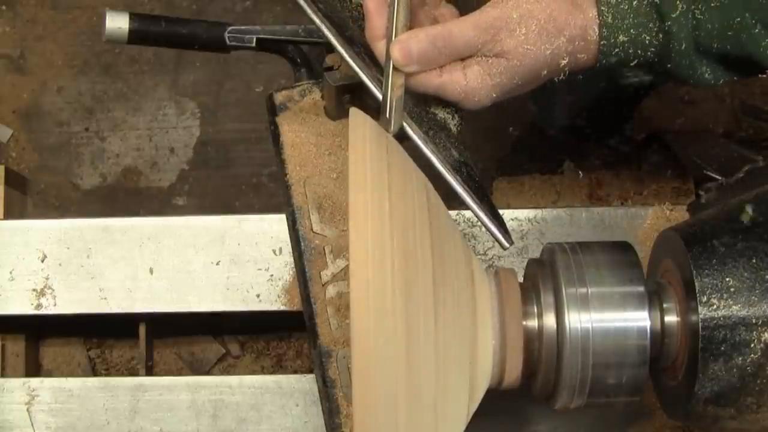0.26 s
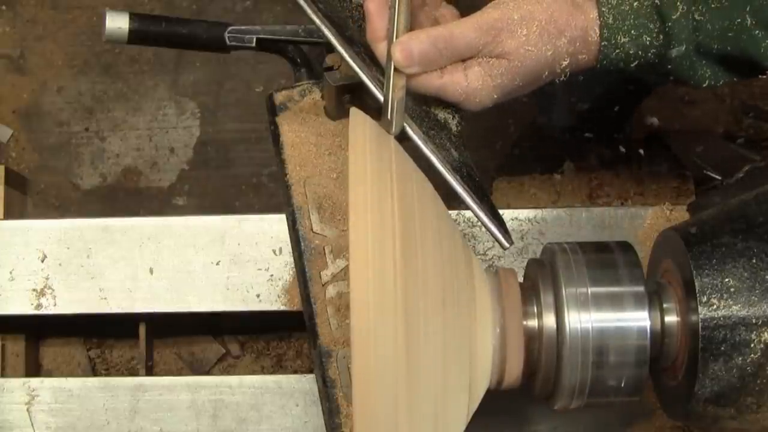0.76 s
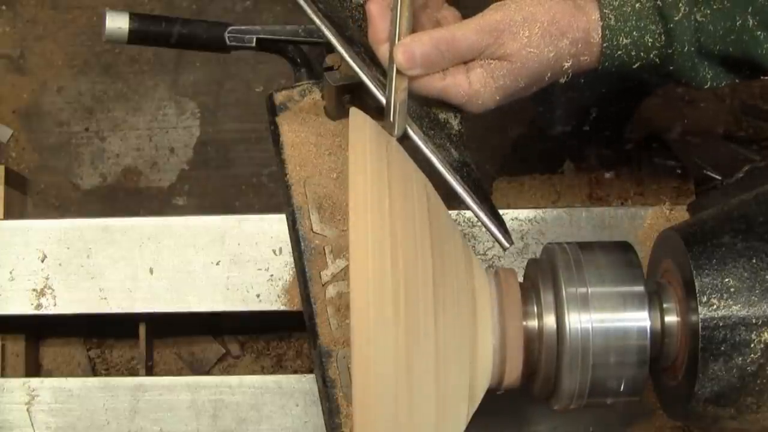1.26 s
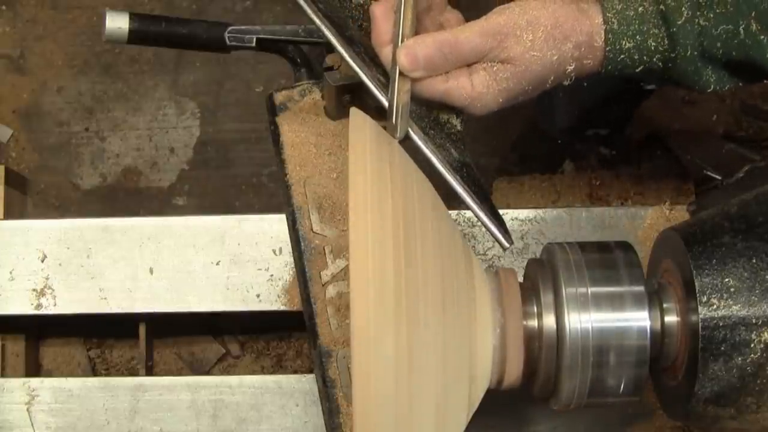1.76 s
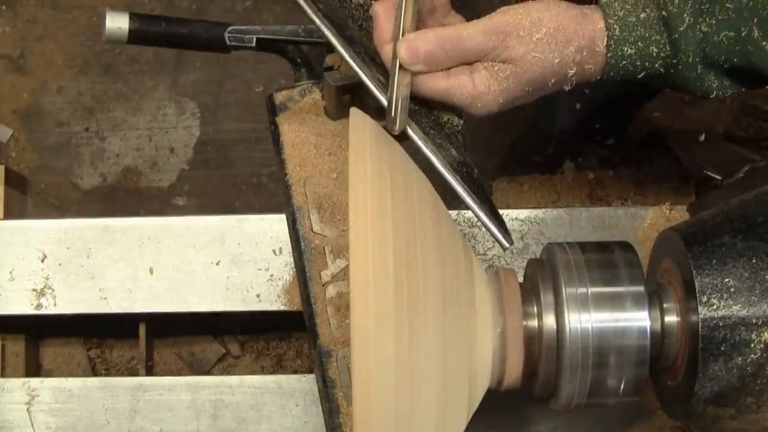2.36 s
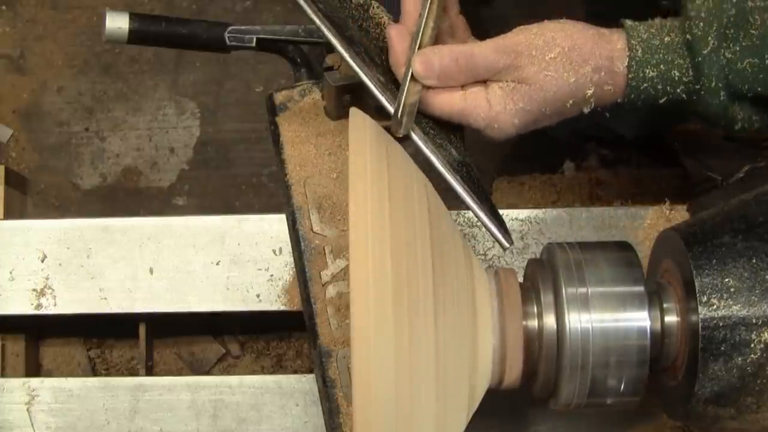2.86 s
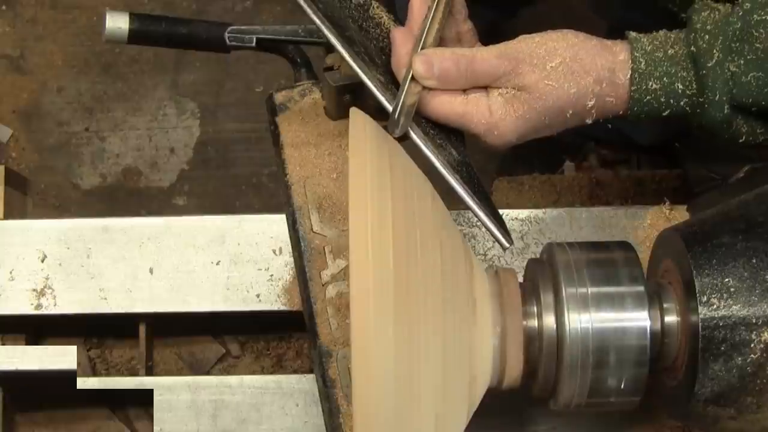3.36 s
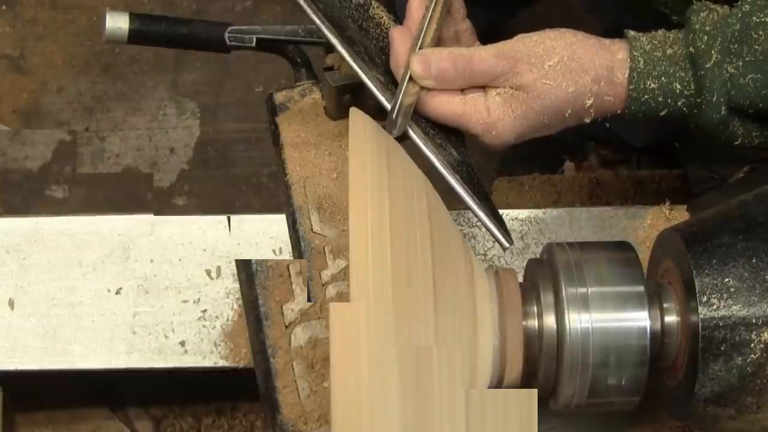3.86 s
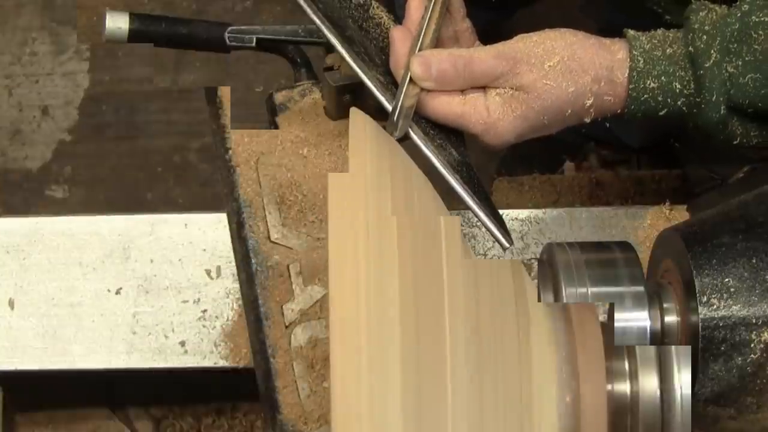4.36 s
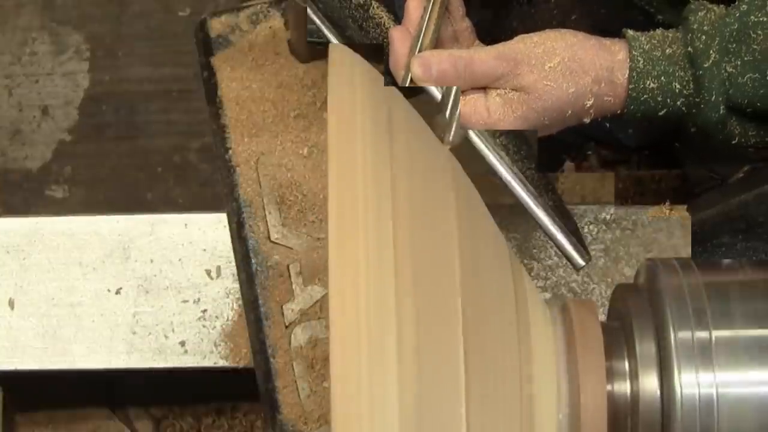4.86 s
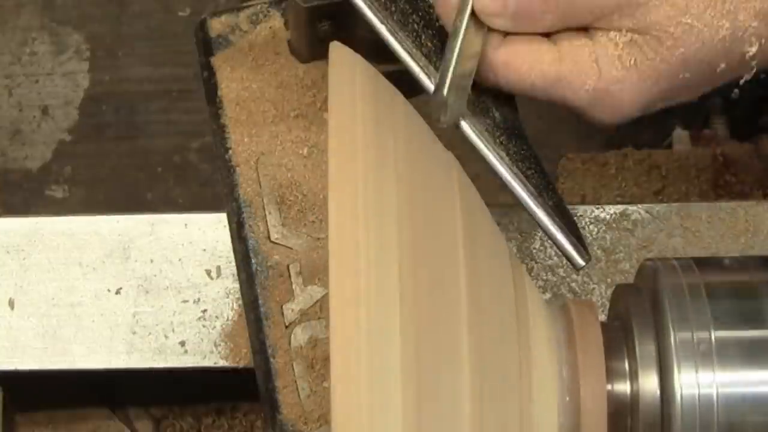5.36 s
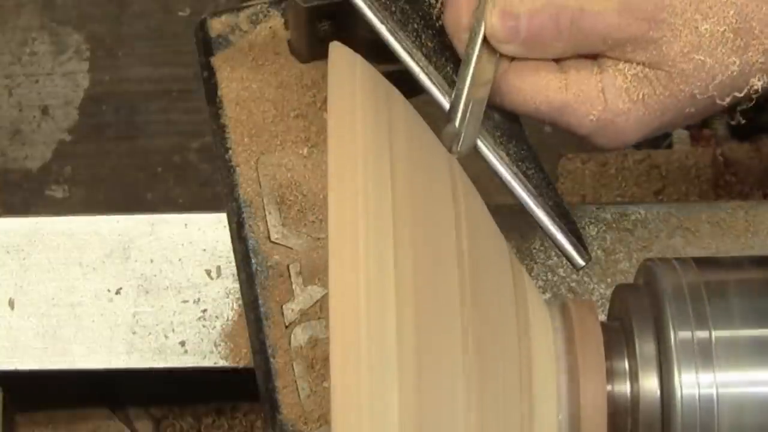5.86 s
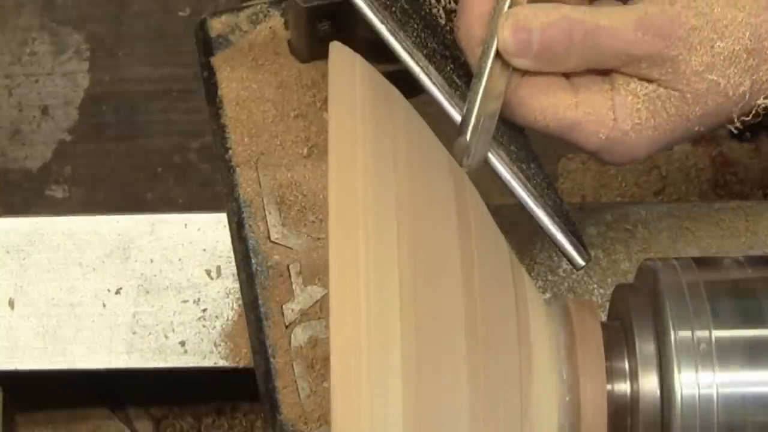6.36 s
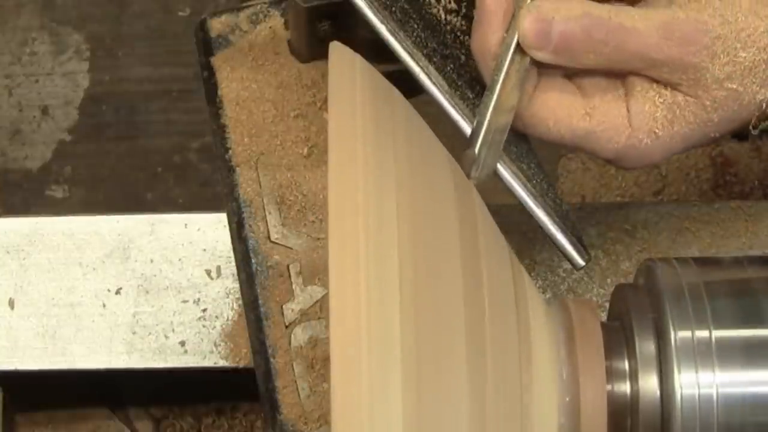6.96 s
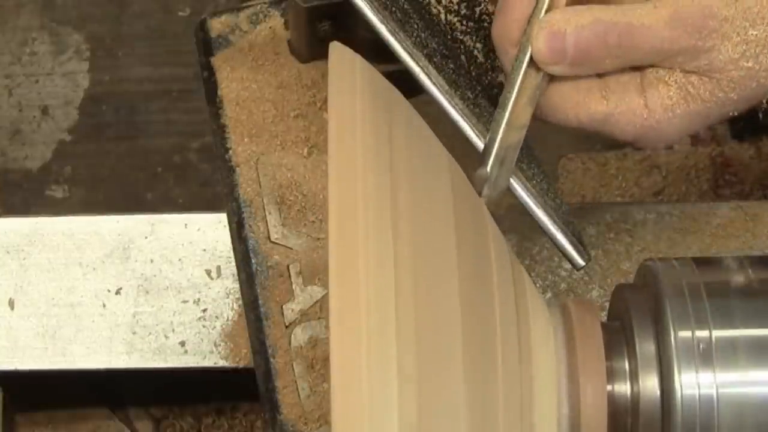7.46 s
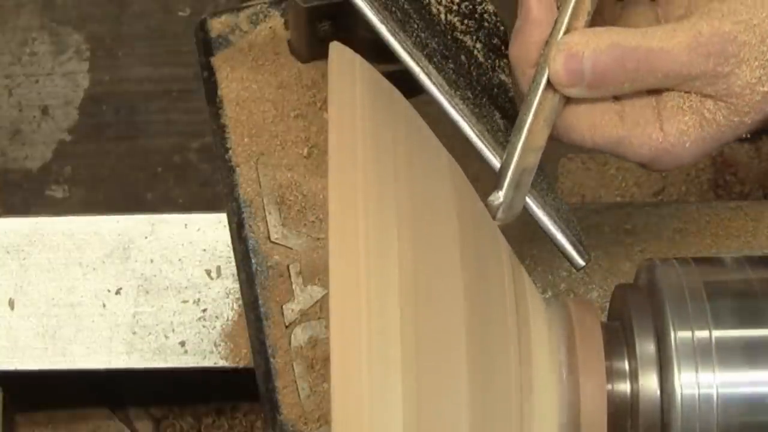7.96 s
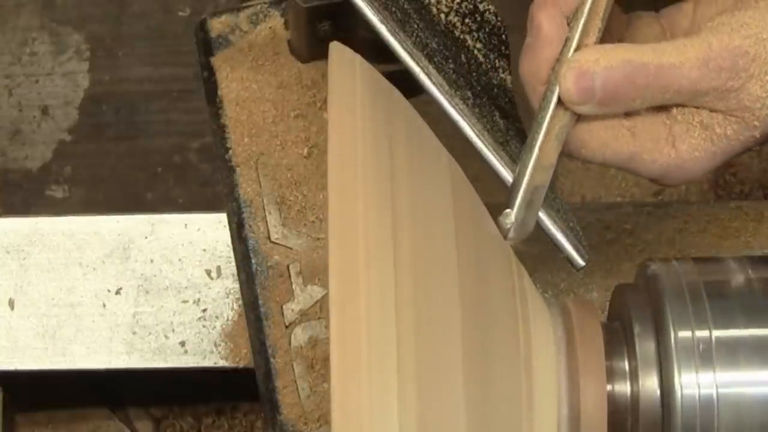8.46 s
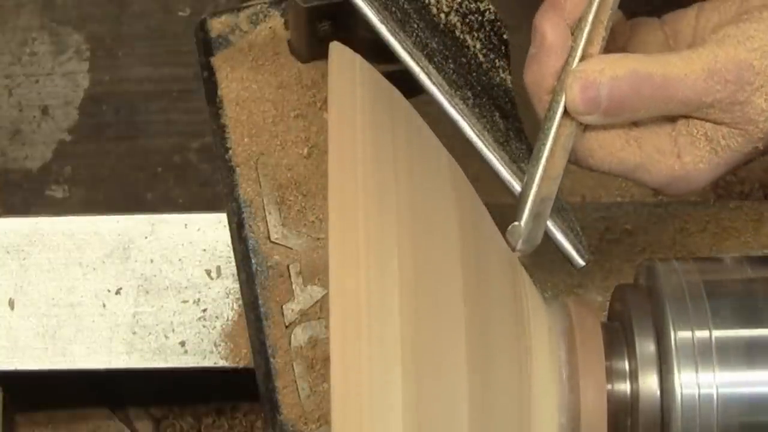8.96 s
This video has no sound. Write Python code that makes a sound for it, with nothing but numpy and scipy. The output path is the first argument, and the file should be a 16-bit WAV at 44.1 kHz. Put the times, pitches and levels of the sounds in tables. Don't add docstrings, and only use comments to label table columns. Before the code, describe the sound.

A gouge shaves a spinning wooden bowl with a pulsing, buzzing hiss, lifts to a thin whine, bites again, then jumps to fast, high-pitched cutting strokes.

```python
import sys
import numpy as np
from scipy import signal
from scipy.fft import rfft, irfft, next_fast_len
from scipy.io import wavfile
from scipy.ndimage import uniform_filter1d

SR = 44100
rng = np.random.default_rng(int(sys.argv[2]) if len(sys.argv) > 2 else 0)


def field_ratio(decibels):
    return 10 ** (np.asarray(decibels, dtype=float) / 20)


def dump_mix(stems):
    frames = np.atleast_2d(stems).T
    limited = np.clip(frames, -1, 1)
    pcm = np.round(limited * 32767).astype(np.int16)
    wavfile.write(sys.argv[1], SR, pcm)


N = 406161
TIME = np.arange(N) / SR
PADDED = next_fast_len(N + SR // 4)
HZ = np.arange(PADDED // 2 + 1) * SR / PADDED + 1e-3
TURN, FAST_TURN = 2949, 589
FAST_HZ = 74.78
SLOW = TIME < 3

# start_s, end_s, hiss_db, ringing over hiss at start_db, at end_db
STROKES = [
    (0, 2.4, -39.5, 5.5, 14),
    (2.385, 2.475, -62, 16, 21),
    (4.545, 5.355, -56, -3.5, -12),
]
FAST_STROKES = [
    (5.542, 6.121, -55.5, -19, -2),
    (6.175, 6.55, -55.5, -3.5, -3.5),
    (6.727, 8.676, -55.5, -1, -1.5),
    (8.688, 9.3, -57.5, 2, -0.5),
]
LIFT_S = (0.086, 0.056, 0.39)
# centre_s, half_width_s, hiss_db, ringing over hiss_db
EASES = [(.65, 0.35, -2.5, 0), (1.041, 0.0073, -2.5, -2), (2.1, 0.58, -3, 2), (5.73, 0.064, -4, 6),
         (7.17, 0.11, 2, -9), (7.47, 0.11, -1.5, -6.5), (8.4, 0.064, -3.5, 3), (8.78, 0.081, -2.5, 2.5),
         (9.12, .02, 1, -2)]
# time_s, peak_db
BITES = [(4.0478, -25), (4.0827, -25), (4.1137, -26.5), (4.1487, -26.5), (4.18, -28), (4.2174, -39.5),
         (4.2494, -46), (4.2817, -36.5), (4.315, -39.5), (4.382, -40), (4.415, -30), (4.447, -31),
         (4.484, -36.5), (4.514, -26.5)]
FAST_BITES = [(2.9174, -57), (2.9692, -48), (5.4246, -53), (5.543, -54), (6.168, -51), (6.6643, -53.5),
              (6.676, -42.5), (6.683, -47), (6.69, -46), (6.704, -45), (6.711, -47), (6.716, -46.5)]
# time_s, peak_db
LIGHT_BITES = [(4.5493, -30.5), (4.5832, -33), (4.6167, -35.5), (4.6506, -34), (4.682, -35.5),
               (4.7159, -33), (4.7494, -37), (4.7828, -33), (4.8167, -35.5), (4.8501, -35), (4.8831, -34.5),
               (4.917, -36.5), (4.9534, -41.5), (4.9843, -39.5), (5.0172, -40), (5.0557, -41),
               (5.0841, -43), (5.119, -42.5), (5.1874, -46.5), (5.2522, -53), (5.2841, -52.5),
               (5.152, -45.5), (5.219, -50), (5.317, -55.5)]
# start as share of a turn, before_db, crest_db
DEEP_GRAIN = [(.095, -1, 5), (.605, -6, 3.5)]
FAST_GRAIN = [(0, -0.18, 5.3), (.45, -1, 4)]

# pitch_hz, level_db per Hz
SHAVING = [(90, -41), (300, -14), (1000, -11.5), (1500, -8), (2300, -0.5), (2680, -19), (2900, 0.5),
           (4630, 0), (6040, -4), (8470, -1), (13800, -17), (14850, -26), (15150, -54)]
LIGHT_SHAVING = [(90, -23), (300, -14.5), (1000, -18.5), (1900, -7), (2680, -6.5), (2910, -1), (3410, -5),
                 (4520, 0), (5160, -6.5), (5590, -4.5), (8180, -3.5), (10300, -6.5), (15700, -19)]
SHAVING_SIDE = [(100, -21.5), (450, -5), (620, -16), (850, 12.5), (1100, -21), (1800, -35), (3000, -35),
                (6000, -8), (9000, -4), (12000, -3.5), (15700, -17.5)]
FAST_SHAVING = [(12, -38), (20, -10), (773, -9.5), (865, -7), (1350, -10), (2050, -8.5), (3120, -8.5),
                (4120, -5.5), (4480, -8.5), (7410, -9), (10700, -5.5), (12200, -6), (15700, -3)]
FAST_SIDE = [(12, -36), (20, 1), (1180, -1.5), (4120, 0.5), (5160, -0.5), (14500, 1.5), (15700, -10)]
# pitch_hz, width_hz, level_db, change_db per s down the wall (slow only)
BOWL = [(163.4, 22, -30, -1), (193, 19, -42.5, -4), (402, 23, -18, -1.5), (697, 285, -21, -3.5),
        (690, 38, -10.5, -7.5), (781, 30, -10.5, -3), (810, 21, -4.5, -2), (844.7, 34, -3, -1.5),
        (836.3, 33, -6, 1.5), (1087, 310, -19, -1.5), (1320, 40, -12.5, -2), (1734, 90, -11, -3.5),
        (2060, 91, -15, -3.5), (2440, 65, -15, -2), (2880, 45, -14.5, -1.5)]
FAST_BOWL = [(920, 75, -27), (2070, 140, -45), (3720, 260, -15), (4540, 120, -20), (8970, 380, 0.5),
             (9860, 85, 4.5), (10550, 480, 5), (11560, 250, 2.5), (14200, 700, -8), (15800, 600, -14)]
# pitch_hz, width_hz, level_db, change_db per s (some)
FLUTE = [(2886, 110, -4, 3), (3832.5, 70, 0, 6.5), (4679, 150, 0.5, 3), (4340, 79, 1.8), (5350, 86, 3.1),
         (6390, 260, 0), (7280, 290, -1), (8850, 470, -5)]

# ripples per turn, level_db
RIPPLES = [(24, -8), (26, -12), (28, -2), (30, -12), (41, -16)]
# ripples per turn, level_db
FINE_RIPPLES = [(47, -11), (50, -8), (54, -8), (61, -10)]
# ripples per turn, level_db
FAST_MIDDLE_RIPPLES = [(24, -14), (27, -10), (29, -13)]
FAST_HIGH_RIPPLES = [(46, -12), (48, -11), (49, -8), (51, -10), (53, -10),
                     (56, -9), (57, -.5), (58, -10), (61, -13), (65, -12)]
# resting_db over hiss, swell_db, centre_s, half_width_s
FAST_RIPPLES = [
    (-26.5, -7.5, 7.46, 0.68),
    (-28, 16, 5.8, 2.2),
    (-20, 9.5, 6.4, 0.32),
]
# time_s, beat_db
THROB_BEAT_DB = [(0, 5), (1.0, -1), (1.4, -1), (2.5, 3), (4.0, 3), (5.4, 3)]

MARKS_AT_S = [.3, .85, 1.2, 1.55, 2.1]
MARKS_A_TURN = [
    [56.2, 56.3, 57.6, 57.1, 56.9],
    [88.8, 88.5, 88.5, 89, 89],
    [117.4, 117.8, 117.2, 118.3, 117.6],
]
MARKS_REST_DB = [-19, -24.5, -24.5]
MARKS_LIGHT_DB = [-18, -19.5, -17.5]
MARKS_START = [.04, .6, .55]
MARKS_LIFT_S = [.01, .05, .06]
# share of a turn, half-width as share, then level_db over rest at each time above
WIDE_MARKS = [(.19, 0.084, 14.4, 13, 9, 1, 9), (.51, 0.081, 12, 9.5, 13, 6, 5.6), (.68, .07, 7, 0, 2, 2, 9),
              (.87, 0.068, 11, -7, 4.5, 8, 13)]
MIDDLE_MARKS = [(.38, 0.22, 11, 14, 17, 5.6, 6), (.82, .13, 10, 16, 14.7, 16.5, 9.5)]
CLOSE_MARKS = [(.0, 0.11, 14, 6, 12, 12, 4), (.27, 0.14, 10, 14, 14, 9.4, 3),
               (.76, 0.1, 13, 12, 17, 22, 15)]

# time_s, level_db
DRIVE = [(0, -40), (2.3, -16), (2.5, -10.5), (2.7, -2.5), (3.0, 0.5), (4.0, -0.5), (4.4, -5), (5.3, -26),
         (5.5, -69)]
# pitch_hz, level_db
WHINE = [(8818, -94.5), (9033, -91.5), (9318, -89), (9464, -99), (9534, -87.5), (9604, -81.5),
         (9679, -70.5), (9895, -64.5), (9964, -85), (10034, -72), (10110, -70), (10180, -87), (10395, -85),
         (10465, -87), (10535, -85), (10756, -105), (10971, -100.5)]
# pitch_hz, level_db
HUM = [(576.0, -71), (646.0, -59.5), (1254, -74.5), (1744, -75.5), (2008, -81.5), (2514, -80)]
FAST_HUM = [(1464, -82), (2180, -91), (2541, -88), (3225, -82)]
# pitch_hz, level_db per Hz
SHOP = [(18, -72), (30, -39), (130, -17), (495, -14.5), (644, -9.5), (715, -11.5), (905, -14.5),
        (1700, -17), (2720, -24.5), (3930, -22.5), (5660, -30), (9080, -24.5), (10100, -13), (11500, -29),
        (15700, -39)]
FAST_SHOP = [(18, -43), (30, -7), (238, -29), (362, -11), (929, -19), (1450, -13), (1880, -13), (3180, -11),
             (3440, -11.5), (15700, -23)]
# pitch_hz, level_db per Hz
BRUSH_COLOUR = [(88, -34), (150, -15.5), (441, -7), (866, 1), (1430, -6.5), (5000, -9.5), (8410, -11),
                (10200, -20), (15000, -32)]
# time_s, peak_db, pitch_hz, time to fall 60 dB_s
KNOCK = [
    (3.961, -51, 235, 0.057),
    (4.041, -42.5, 230, 0.083),
    (4.055, -65, 75, .12),
]


def in_time(rows):
    s, *columns = np.transpose(rows)
    return [np.interp(TIME, s, column) for column in columns]


def swell(x, centre, half_width):
    return np.exp(-((x - centre) / half_width) ** 2)


def drift(rate):
    r = np.exp(-80 * np.pi * rate / SR)
    slow = signal.lfilter([1], [1, -2 * r, r * r], rng.standard_normal(N // 40 + 2002))[2000:]
    return np.interp(np.arange(N) / 40, np.arange(len(slow)), slow / slow.std())


def follow(x, lag_s):
    r = np.exp(-1 / (lag_s * SR))
    return signal.lfilter([1 - r], [1, -r], x)


def colour(x, spectrum, low_hz, high_hz, patchy_db):
    hz, level_db = np.transpose(spectrum)
    gain = field_ratio(np.interp(np.log(HZ), np.log(hz), level_db, left=-90))
    gain = gain / np.sqrt(np.mean(gain ** 2 * (HZ > low_hz) * (HZ < high_hz)))
    shaped = rfft(x, PADDED) * gain
    band = np.clip(np.log(HZ / 700), 0, 3)
    out = 0
    for k in range(4):
        part = irfft(shaped * np.clip(1 - abs(band - k), 0, 1), PADDED)[..., :N]
        out = out + field_ratio(patchy_db * drift(22)) * part
    return out


def resonate(x, modes, wander_db):
    out, power = 0, 0
    travel_s = np.where(SLOW, TIME - 1.2, 0)
    for k, (hz, width, level_db, *moving) in enumerate(modes):
        r = np.exp(-np.pi * width / SR)
        poles = [1, -2 * r * np.cos(2 * np.pi * hz / SR), r * r]
        ring = signal.lfilter([(1 - r * r) / 2, 0, (r * r - 1) / 2], poles, x)
        gain = field_ratio(level_db + wander_db * drift(2.53) + sum(moving) * travel_s)
        out = out + (-1) ** k * gain * ring
        power += field_ratio(2 * level_db) * np.pi * width / SR
    return out / np.sqrt(power)


def tones(lines, waver_db):
    out = 0
    for hz, db in lines:
        level = np.sqrt(2) * field_ratio(db + waver_db * drift(2.1))
        out = out + level * np.sin(2 * np.pi * (hz * TIME + rng.random()))
    return out


def stereo(mid, side, pan_db):
    return np.array([mid + side, mid - side]) * field_ratio([[pan_db / 2], [-pan_db / 2]])


def workshop(x, t60, alike_hz):
    age = np.arange(int(t60 * SR)) / SR
    dying = field_ratio(-60 * age / t60) * (age > t60 / 60)
    mid, side = signal.lfilter([1], [1, -.4], rng.standard_normal((2, SR))[:, :len(age)] * dying)
    high_pass = signal.butter(1, alike_hz, "high", fs=SR, output="sos")
    echoes = stereo(mid, signal.sosfilt(high_pass, side), 0)
    return signal.fftconvolve(x[None], echoes / np.sqrt(np.sum(mid ** 2)), axes=1)[:, :N]


def fast_drive():
    mid, side = field_ratio(-81) * colour(rng.standard_normal((2, N)), FAST_SHOP, 3500, 11000, patchy_db=-3.5)
    cutting = sum((TIME > start) * (TIME < end) for start, end, *_ in FAST_STROKES)
    hum = tones(FAST_HUM, waver_db=.7) * field_ratio(-7 * follow(cutting, lag_s=.03))
    air_dip = field_ratio(-8 * follow(cutting, lag_s=0.055))
    fade = field_ratio(38 * np.minimum(TIME - 5.4, 0) - 1.5 * (TIME > FAST_STROKES[0][0]))
    return fade * stereo(air_dip * mid + hum, field_ratio(-1) * air_dip * side, .2)


def drive():
    gain_db, = in_time(DRIVE)
    whine = field_ratio(0.88 * gain_db + 1) * tones(WHINE, waver_db=.6)
    hum = field_ratio(0.94 * gain_db - 2) * tones(HUM, waver_db=.7)
    air = colour(rng.standard_normal((2, N)), SHOP, 1000, 5000, patchy_db=.7)
    mid, side = field_ratio(-64.5 + gain_db) * air
    return stereo(whine, 0, 4.5) + stereo(hum, 0, 1.1) + stereo(mid, field_ratio(-7.0) * side, .3)


def brush():
    wipe_s, hold_s = 3.028, 0.022
    early = np.clip(wipe_s - hold_s - TIME, 0, 1)
    late = np.clip(TIME - wipe_s - hold_s, 0, 1)
    on = field_ratio(-47.5 - 230 * early - 260 * late)
    mid, side = colour(on * rng.standard_normal((2, N)), BRUSH_COLOUR, 300, 9000, patchy_db=2.5)
    return stereo(mid, field_ratio(-14.0) * side, 1.5)


def approach():
    knock = 0
    for s, peak_db, hz, t60 in KNOCK:
        age = np.clip(TIME - s, 0, 1)
        shape = field_ratio(peak_db - 60 * age / t60) * (1 - np.exp(-age / .004))
        knock = knock + shape * np.sin(2 * np.pi * hz * age)
    before = np.clip(4.05 - TIME, 0, 2)
    squeal_hz = 4390 - 600 * np.minimum(before, .8)
    squeal_db = -71 - 7 * before
    phase = 2 * np.pi * np.cumsum(squeal_hz + 30 * drift(60)) / SR
    wave = np.sin(phase) + field_ratio(-5 - 30 * before) * np.sin(1.5 * phase)
    squeal = field_ratio(squeal_db + 2 * drift(25)) * wave
    return stereo(knock + squeal * (before < 1.4) * (TIME < 4.42), 0, .5)


def surface(turn, memory, rough_db):
    shape = (N // turn + 20, turn)
    size_db = rough_db * np.minimum(rng.exponential(1, shape), 4)
    fibres = rng.standard_normal(shape) * field_ratio(size_db)
    ridges = signal.lfilter([1], [1, -memory], fibres, axis=0)[19:].ravel()[:N]
    return ridges / ridges.std()


def grain(sides, turn, from_s, rise, hold, sag_db):
    points = []
    for at, low_db, top_db in sides:
        points += [(at, low_db), (at + rise, top_db), (at + rise + hold, top_db - sag_db)]
    share, db = np.transpose(points)
    return field_ratio(np.interp((TIME - from_s) * SR / turn, share, db, period=1))


def contact(strokes, lifts, grains, dig_db, bites, ring_db, bite_s, crest_db):
    hiss, body = np.full(N, 1e-9), np.full(N, 1e-9)
    hand_db = sum(db * swell(TIME, s, width) for s, width, db, _ in EASES)
    ease_db = sum(db * swell(TIME, s, width) for s, width, _, db in EASES)
    for (start, end, db, from_db, to_db), lift_s, bumps in zip(strokes, lifts, grains):
        dig = dig_db * np.exp(-np.clip(TIME - start, 0, None) / 0.14)
        on = (TIME >= start) * bumps * field_ratio(db + hand_db - dig)
        down = np.clip((end - TIME) / lift_s, 0, 1)
        ringing_db = ease_db + np.interp(TIME, [start, end], [from_db, to_db])
        hiss += on * down
        body += on * down ** 0.51 * field_ratio(ringing_db)
    age = TIME[:SR // 8] / bite_s
    for s, peak_db in bites:
        bite = field_ratio(peak_db - crest_db) * (np.e * age * np.exp(-age)) ** 0.8
        now = slice(round(s * SR), round(s * SR) + SR // 8)
        hiss[now] += bite
        body[now] += bite * field_ratio(ring_db)
    return hiss, body


def fast_ripples(hiss):
    low_db, middle_db, high_db = [db + swell_db * swell(TIME, s, width)
                                  for db, swell_db, s, width in FAST_RIPPLES]
    late_tone = swell(TIME, 9.2, .55) * tones([(972, 3)], waver_db=2)
    low = field_ratio(low_db) * (tones([(898, 4)], waver_db=1.2) + late_tone)
    middle_lines = [(k * FAST_HZ, db) for k, db in RIPPLES[1:] + FAST_MIDDLE_RIPPLES]
    middle = field_ratio(middle_db - 4) * tones(middle_lines, waver_db=1.2)
    high_db = high_db + 8 * swell(TIME, 5.55, .08) + 4 * swell(TIME, 6.05, .06)
    high = field_ratio(high_db) * tones([(k * FAST_HZ, db) for k, db in FAST_HIGH_RIPPLES], waver_db=2.2)
    return follow(hiss, lag_s=.008) * field_ratio(1.6 * drift(14)) * (low + middle + high)


def fast_cut():
    bumps = grain(FAST_GRAIN, SR / FAST_HZ, 0.004, rise=0.13, hold=0.14, sag_db=2.5)
    hiss, body = contact(FAST_STROKES, [.022] * 4, [bumps] * len(FAST_STROKES), 3, FAST_BITES, 0,
                         bite_s=0.0014, crest_db=12.0)
    fibres = hiss * surface(FAST_TURN, memory=0.16, rough_db=3.5)
    shavings = field_ratio(-5.0) * colour(fibres, FAST_SHAVING, 2600, 15760, patchy_db=1.0)
    push = body * surface(FAST_TURN, memory=.7, rough_db=2.5)
    bowl = field_ratio(-3) * resonate(push, FAST_BOWL, wander_db=2.2) + fast_ripples(hiss)
    side_fibres = hiss * surface(FAST_TURN, memory=0.14, rough_db=6.0)
    side = field_ratio(-15.0) * colour(side_fibres, FAST_SIDE, 3000, 15000, patchy_db=3.0)
    room = field_ratio(-21) * workshop(shavings + bowl, t60=.08, alike_hz=1500)
    return stereo(shavings + bowl, side, 0.35) + room


def dust(shavings, hiss):
    high_pass = signal.butter(2, 7300, "high", fs=SR, output="sos")
    top = signal.sosfiltfilt(high_pass, shavings)
    late = np.interp(TIME - 0.0022 * SLOW, TIME, hiss)
    late = late * np.clip(late / uniform_filter1d(late, TURN), .2, 3) ** (0.69 * SLOW)
    return shavings + top * (np.clip(late / hiss, .25, 4) - 1)


def shaving_hiss(hiss):
    fibres = hiss * surface(TURN, memory=.35, rough_db=2.2)
    deep = colour(fibres * SLOW, SHAVING, 2760, 11000, patchy_db=1.94)
    light = colour(fibres * ~SLOW, LIGHT_SHAVING, 1900, 13500, patchy_db=1.0)
    flute = resonate(hiss * surface(TURN, memory=0.81, rough_db=1.0), FLUTE, wander_db=2.5)
    return dust(deep + light + field_ratio(np.where(SLOW, -7.5, -6)) * flute, hiss)


def worn_ripples(hiss, body, even):
    coarse_lines = [(k * SR / TURN, db) for k, db in RIPPLES]
    coarse = field_ratio(-15.0) * follow(body, lag_s=0.0095) * tones(coarse_lines, waver_db=-1.5)
    fine_lines = [(k * SR / TURN, db) for k, db in FINE_RIPPLES]
    fine_db = -14.0 - 4 * ~SLOW - 4 * swell(TIME, 1.6, 0.67)
    fine = field_ratio(fine_db) * even * tones(fine_lines, waver_db=2.0)
    beat_db = in_time(THROB_BEAT_DB)[0] * np.cos(2 * np.pi * TIME * SR / TURN)
    throb_db = -27 + beat_db + 5 * np.where(SLOW, TIME, 6.1 - TIME)
    push = follow(hiss ** 0.82 * body ** 0.22, lag_s=0.010)
    throb = field_ratio(throb_db) * push * tones([(13 * SR / TURN, 0)], waver_db=1.0)
    return coarse + fine + throb


def places(rows):
    share = TIME * SR / TURN
    return sum(np.interp(TIME, MARKS_AT_S, db) * swell((share - at + .5) % 1 - .5, 0, width)
               for at, width, *db in rows)


def chatter_marks(body, even):
    out = 0
    left_s = 2.475 - TIME
    patches = (WIDE_MARKS, MIDDLE_MARKS, CLOSE_MARKS)
    for marks, start, lift_s, rest_db, light_db, rows in zip(
            MARKS_A_TURN, MARKS_START, MARKS_LIFT_S, MARKS_REST_DB, MARKS_LIGHT_DB, patches):
        share = (TIME * SR / TURN - start) % 1
        lifting = np.clip(left_s / lift_s, 0, 1) * np.clip((left_s - lift_s) / .04, .1, 1)
        deep = even * lifting * field_ratio(rest_db + places(rows))
        light = follow(body, lag_s=0.0053) * field_ratio(light_db)
        push = np.where(SLOW, deep, light)
        seam = np.sin(np.pi / 2 * np.clip(np.minimum(share, 1 - share) / .035, 0, 1)) ** 2
        wave = np.sqrt(2) * np.sin(2 * np.pi * np.interp(TIME, MARKS_AT_S, marks) * share)
        out = out + push * seam * field_ratio(1.0 * drift(8.2)) * wave
    return out


def cut():
    grains = (grain(DEEP_GRAIN, TURN, 0, rise=0.083, hold=0.18, sag_db=2.0), 1, 1)
    bites = BITES + [(s - .003, db) for s, db in LIGHT_BITES]
    hiss, body = contact(STROKES, LIFT_S, grains, 0, bites, 0.5, bite_s=0.0069, crest_db=12.5)
    shavings = shaving_hiss(hiss)
    push = body * surface(TURN, memory=.75, rough_db=1.5)
    bowl = field_ratio(-7) * resonate(push, BOWL, wander_db=1.)
    even = follow(np.minimum(uniform_filter1d(body, TURN), 3 * body), lag_s=.004)
    ripples = worn_ripples(hiss, body, even)
    chatter = chatter_marks(body, even)
    side_fibres = hiss * surface(TURN, memory=.3, rough_db=3.0)
    side = field_ratio(-18.0) * colour(side_fibres, SHAVING_SIDE, 3000, 8500, patchy_db=4.5)
    to_room = shavings + follow(bowl, lag_s=0.00006) + ripples + 0.19 * chatter
    room = field_ratio(-15.5) * workshop(to_room, t60=0.43, alike_hz=2580)
    return stereo(shavings, side, -0.12) + stereo(bowl + ripples + chatter, 0, 1.0) + room


def scene():
    return fast_drive() + drive() + brush() + approach() + fast_cut() + cut()


def top_cut(x):
    return signal.sosfilt(signal.butter(12, 15890, fs=SR, output="sos"), x)


def record(dry):
    low_pass = signal.ellip(12, .3, 70, 15760, fs=SR, output="sos")
    mix = signal.sosfilt(low_pass, dry)
    return top_cut(mix)


dry = scene()
out = record(dry)
dump_mix(out)
```